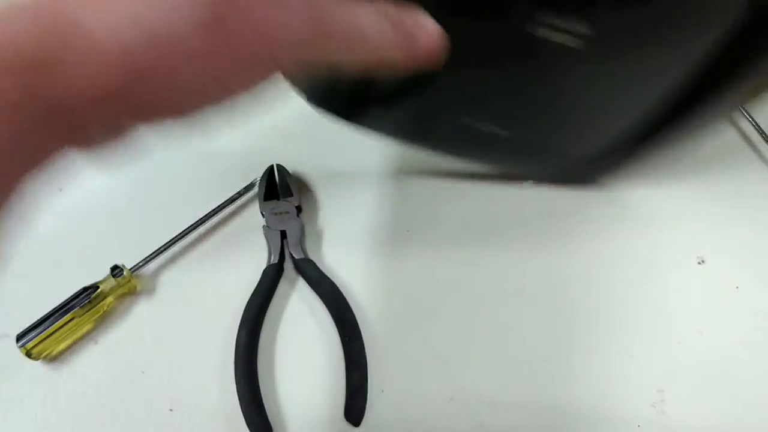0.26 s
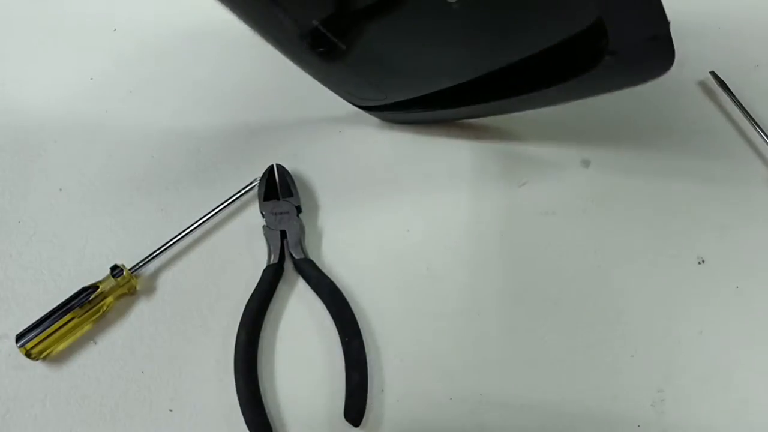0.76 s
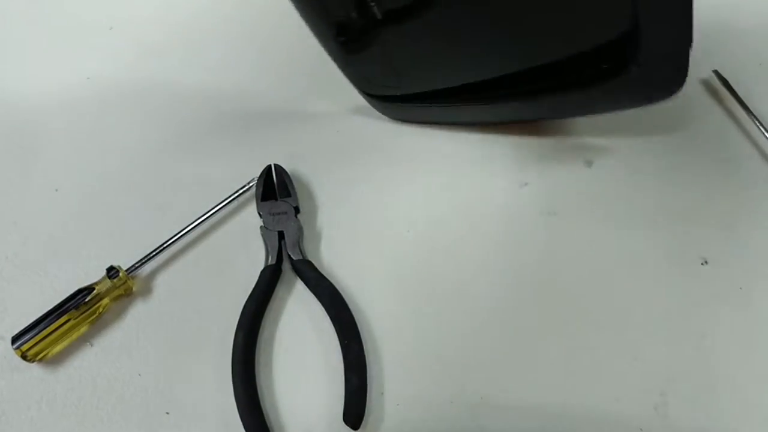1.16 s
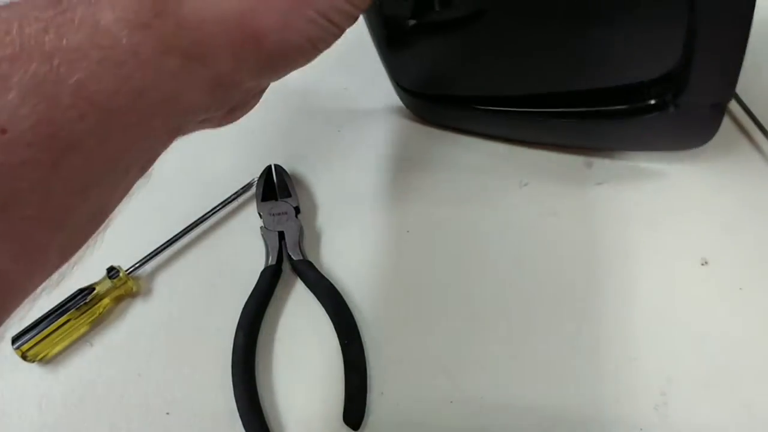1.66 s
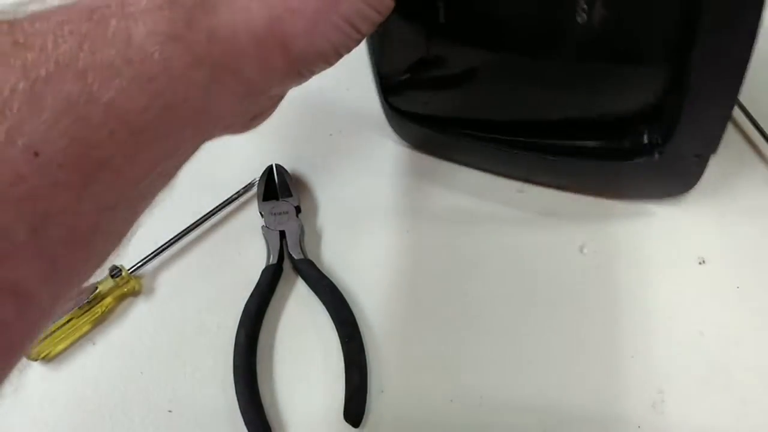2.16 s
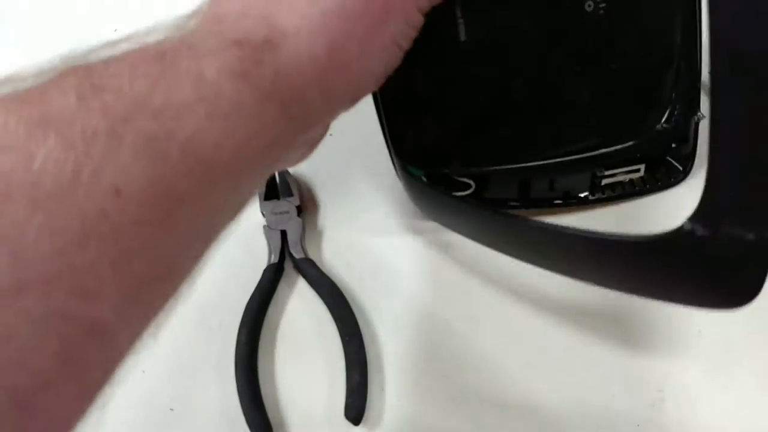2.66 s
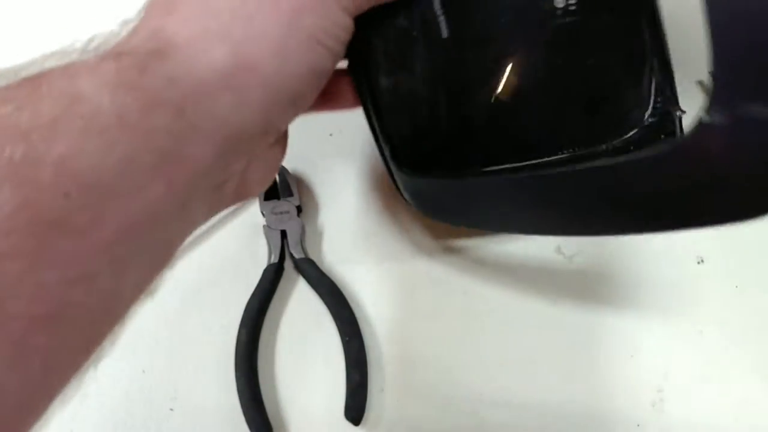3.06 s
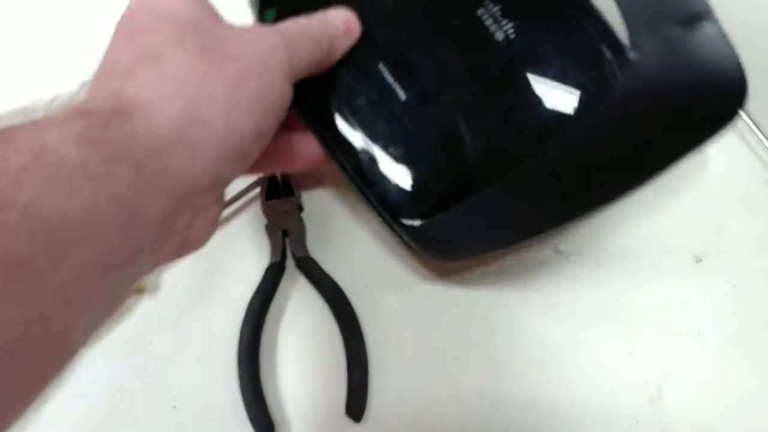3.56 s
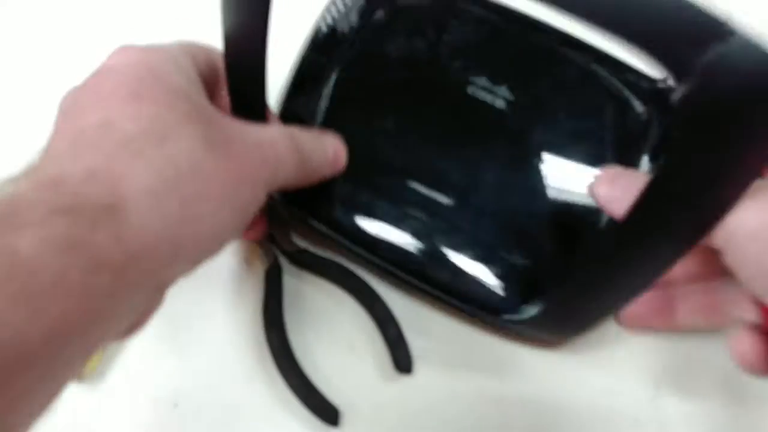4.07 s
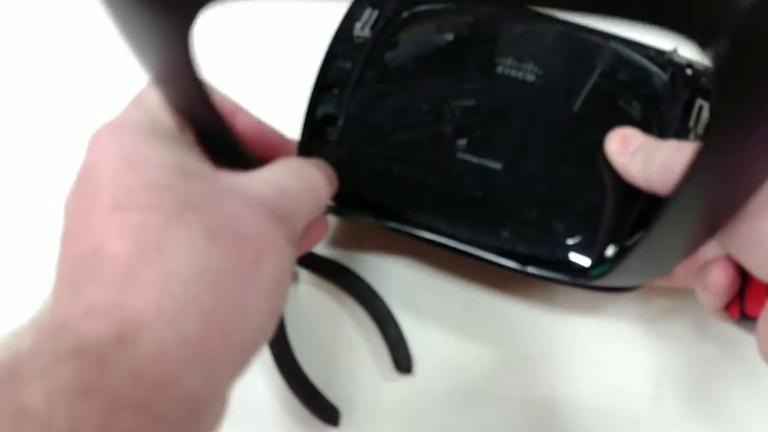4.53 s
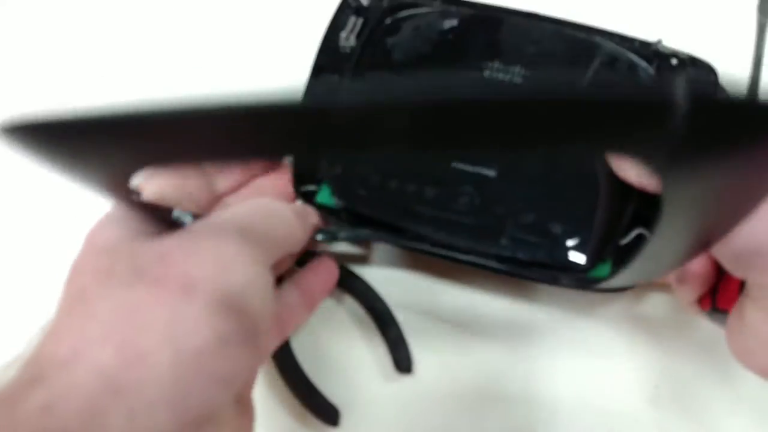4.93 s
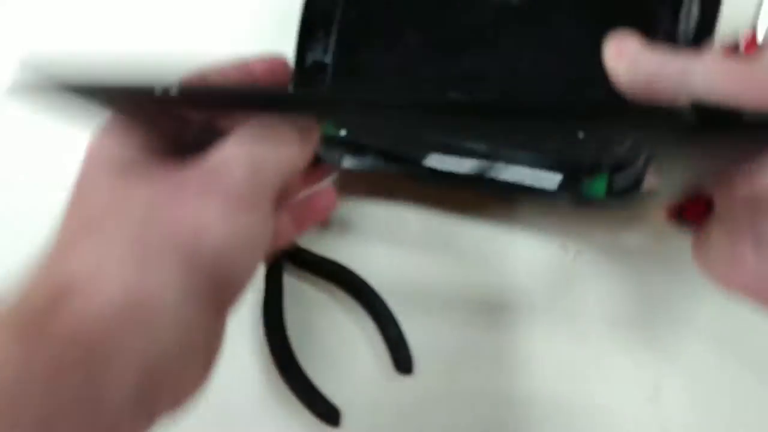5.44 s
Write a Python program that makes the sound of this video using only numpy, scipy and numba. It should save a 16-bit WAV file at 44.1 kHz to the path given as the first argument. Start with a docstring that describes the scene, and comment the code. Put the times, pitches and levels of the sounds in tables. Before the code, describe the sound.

Hands force a hard plastic case apart on a workbench, heard close in stereo in a bare, quiet room. It opens with a very brief, soft scrape and small clicks. The case knocks dully on the bench at 0.6 seconds, and a loud, bright snap follows at 1.1, with smaller clicks after it. Around 1.8 seconds comes a quick cluster of very loud cracks with a thump and a short rumble. Lighter snaps lead to another hard crack and knock at about 2.5 seconds. From 3 to 4 seconds there are only soft, scattered clicks and faint finger rubbing. A knock at 4.1 precedes one more loud snap at 4.4. Faint creaking ticks run from 4.7 to 5.2 seconds, with a moderate click and bump at 4.9, and two smaller snaps come near 5.5 and 5.7. The hardest snaps leave a short echo.

```python
"""Sharp plastic snaps, knocks and creaks in a bare room: hands force a hard case apart over a workbench.
Each snap of a clip is a burst of tiny fractures that makes the shell ring. The case knocks and drags
on the bench top, while the fingers rub and creak. A stereo recorder stands close by; its limiter
turns the sound down on the hardest snaps, then lets the echo of the room swell back."""
import sys
import numpy as np
from scipy import signal
from scipy.fft import rfft, irfft
from scipy.io import wavfile
from scipy.ndimage import uniform_filter1d
from numba import njit

SR = 44100
rng = np.random.default_rng(int(sys.argv[2]) if len(sys.argv) > 2 else 0)


def transcribe(signal):
    """Save signal, clipped to [-1, 1], as a 16-bit WAV file at the path in sys.argv[1]."""
    frames = np.atleast_2d(signal).T
    limited = np.clip(frames, -1, 1)
    pcm = np.round(limited * 32767).astype(np.int16)
    wavfile.write(sys.argv[1], SR, pcm)


N = 251370

# The bench top's natural tones. Each row: pitch in Hz, level in dB, undamped seconds to fade by 60 dB.
BENCH_MODES = [(104, -5, 0.13), (177.3, -24, 0.089), (198.6, 3, 0.15), (264, -7, 0.12), (294, -5, 0.099),
               (289, 3.5, 0.1), (345, -10.5, 0.056), (393.5, 1.5, 0.072), (494, -17.5, 0.15),
               (576, -16, 0.091)]
# A pan is left minus right level. The case's panel is a little louder on the right but sooner on the left.
PANEL_PAN_DB, PANEL_LEAD_SAMPLES = -1.2, 3.4


def undb(db):
    return 10 ** (np.asarray(db) / 20)


def level(x, db):
    """Scale a sound to an average (RMS) level."""
    return x * undb(db) / np.sqrt(np.mean(x ** 2))


def band(x, lo_hz, hi_hz):
    """Keep what lies between two frequencies."""
    edges = [lo_hz, min(hi_hz, .45 * SR)]
    return signal.sosfilt(signal.butter(2, edges, "band", fs=SR, output="sos"), x)


def ring(x, hz, width_hz):
    """One resonance: the narrower it is, the longer it rings."""
    return signal.lfilter(*signal.iirpeak(hz, hz / width_hz, SR), x)


def stereo_noise(samples, alike):
    """Noise for two microphones; alike (0 to 1) is the share they have in common."""
    common, left, right = rng.standard_normal((3, samples))
    return np.sqrt(alike) * common + np.sqrt(1 - alike) * np.array([left, right])


def place(out, start, sound, peak_db, pan_db=0., lead=None):
    """Mix a sound in. The left hears it lead samples sooner; by default the louder side is first."""
    sound = sound * undb(peak_db + np.array([[pan_db], [-pan_db]]) / 2) / np.abs(sound).max()
    if lead is None:
        lead = 1.75 * pan_db
    lag = int(round(np.clip(lead, -6, 6)))
    for side, delay in enumerate((max(-lag, 0), max(lag, 0))):
        i = int(start * SR) + delay
        out[side, i:i + sound.shape[1]] += sound[side, :N - i]


def air():
    """Steady room tone and microphone hiss."""
    # The tone of the noise. Each row: frequency in Hz, relative level in dB.
    spectrum = [(15, -36), (25, -6), (175, 0), (416, -5.5), (659, -7), (1160, -8), (1740, -16.5),
                (2690, -13), (3430, -43.5), (7110, -20.5), (9570, -12.5), (14800, -16.5), (16000, -22.5)]
    row_hz, row_db = np.transpose(spectrum)
    hz = np.maximum(np.arange(N // 2 + 1) * SR / N, 1)
    gain = undb(np.interp(np.log(hz), np.log(row_hz), row_db))
    return level(irfft(rfft(stereo_noise(N, alike=0.18)) * gain, N), db=-65)


def room_echo(sound):
    """The walls return a smooth wash of echo; its bass arrives alike at both microphones."""
    # Octave-wide bands of echo. Each row: centre in Hz, seconds to fade by 60 dB, level in dB.
    echo_bands = [(109, 0.23, -23), (252, 0.29, -24.5), (463, 0.22, -21), (1080, 0.46, -27.5),
                  (2140, 0.41, -22.5), (4536, 0.49, -21.5), (7960, 0.34, -16), (13100, 0.23, -30.5),
                  (15400, 0.22, -19)]
    peak_width_hz, rise_s = 150, 0.017
    t = np.arange(SR) / SR
    peaks = uniform_filter1d(rng.standard_normal(SR // 2 + 1), peak_width_hz) * np.sqrt(peak_width_hz)
    colour = undb(2.5 * np.clip(peaks, -2, 2))  # some pitches echo more than others
    rise = np.minimum(t / rise_s, 1) ** 2
    echo = 0
    for hz, fade_s, db in echo_bands:
        noise = irfft(rfft(stereo_noise(SR, alike=min(200 / hz, 0.85))) * colour, SR)
        tail = band(noise, hz / np.sqrt(2), hz * np.sqrt(2)) * undb(-60 * t / fade_s)
        echo = echo + undb(db) * tail * rise / np.sqrt(min(hz, 12000) / 100)
    return signal.fftconvolve(sound.mean(axis=0)[None], echo)[:, :N]


def random_grains(per_second, samples_each):
    """Short pulses of uneven strength that make a noise sound rough."""
    starts = rng.random(N) < per_second / SR
    return uniform_filter1d(starts * undb(2.5 * rng.exponential(size=N)), samples_each)


def handling_noise():
    """Low rumble, creak and rustle: quiet handling noise whose levels rise and fall over time."""
    # Each row: time in seconds, then the levels in dB of the rumble, the creak and the rustle.
    noise_levels = [(0.0, -48.5, -51.5, -62.5), (0.07, -65, -55, -62), (0.38, -111, -91, -72),
                    (0.63, -54, -60.5, -94), (0.761, -55, -60.5, -59), (0.97, -65, -70, -61.5),
                    (1.19, -46.5, -71, -59), (1.41, -62.5, -64.5, -67), (1.67, -62.5, -70, -58),
                    (1.86, -27, -36.5, -48), (1.94, -43, -42, -58), (2.131, -53.5, -62.5, -100),
                    (2.361, -76, -79.5, -68), (2.478, -58, -71, -56), (2.636, -35, -49.5, -58.5),
                    (2.72, -46, -56, -57), (2.82, -58, -64.5, -77.5), (3.14, -76, -87.5, -80),
                    (3.259, -83.5, -89.5, -75.5), (3.501, -87.5, -76, -81.5), (3.671, -77, -69, -75.5),
                    (3.859, -71.5, -74, -61), (3.979, -65, -74.5, -64.5), (4.19, -64, -64.5, -61.5),
                    (4.48, -63.5, -68, -72), (4.642, -60, -63, -69), (5.001, -61.5, -64, -69),
                    (5.52, -71, -74.5, -72.5), (5.7, -58, -52.5, -62)]
    times, *columns = np.transpose(noise_levels)
    rumble_db, creak_db, rustle_db = (np.interp(np.arange(N) / SR, times, db) for db in columns)
    grains = random_grains(per_second=250, samples_each=200) + 0.00095
    shake = stereo_noise(N, alike=0.8) * grains
    rumble = sum(undb(db) * ring(shake, hz, 4 / fade_s) for hz, db, fade_s in BENCH_MODES)
    jerks = random_grains(per_second=340, samples_each=90) + 0.004
    rasp = stereo_noise(N, alike=0.13) * jerks
    creak = ring(rasp, 1400, 250) + .5 * ring(rasp, 760, 360) + 0.3 * ring(rasp, 2000, 200)
    creak = ring(creak, 980, 820)
    rustle = band(stereo_noise(N, alike=0.45) * (grains + 0.026), 2100, 27000)
    return level(rumble, rumble_db) + level(creak, creak_db) + level(rustle, rustle_db)


def rim_groan():
    """The rim drags over the bench in quick, regular slips that make a short, rough tone."""
    # Each row: time in seconds, slips per second (the pitch in Hz), level in dB.
    drag = [(0.004, 436, -44), (0.013, 440.5, -46.5), (0.026, 438, -35.5), (0.045, 462, -47),
            (0.053, 350, -44), (0.061, 306, -47.5), (0.069, 300, -66)]
    # The relative level in dB of each harmonic, lowest first.
    harmonics_db = [0.5, -9, -7.5, -17]
    times, hz, db = np.transpose(drag)
    t = np.arange(N) / SR
    wobble = uniform_filter1d(rng.standard_normal(N), 200) * np.sqrt(200)
    phase = 2 * np.pi * np.cumsum(np.interp(t, times, hz) * (1 + 0.026 * wobble)) / SR
    tone = sum(undb(gain_db) * np.sin(k * phase) for k, gain_db in enumerate(harmonics_db, 1))
    return level(tone, np.interp(t, times, db, left=-200, right=-200) + 0.61 * wobble)


def joint_ticks():
    """A joint creaks under the grip in single ticks: a ring of the panel plus a wisp of hiss."""
    # Each row: start in seconds, peak level in dB, panel pitch in Hz.
    ticks = [(4.678, -45, 1170), (4.712, -54, 1090), (4.745, -46, 1160), (4.757, -50, 1200),
             (4.769, -53, 1080), (4.784, -48.5, 1200), (4.797, -54, 1166), (4.862, -46, 980),
             (4.982, -56, 1440), (5.015, -52, 1200), (5.079, -57, 1170), (5.095, -49, 1230),
             (5.103, -50, 1124), (5.116, -49, 1150), (5.121, -56, 1200), (5.133, -55, 1210),
             (5.152, -52, 1370), (5.17, -50.5, 1220), (5.198, -53, 1100)]
    out, t = np.zeros((2, N)), np.arange(SR // 10) / SR
    click = np.ones((2, 1)) * (t == 0)
    for start, db, hz in ticks:
        panel = ring(ring(click, hz, width_hz=98), hz, width_hz=450)
        place(out, start, panel, db, PANEL_PAN_DB, PANEL_LEAD_SAMPLES)
        hiss = stereo_noise(len(t), alike=0.53) * undb(-60 * t / 0.015)
        place(out, start, band(hiss, 5100, 14600), db + 1.5, pan_db=6.)
    return out


def bench_knocks():
    """The case rings the bench's low tones, in a new mix at each spot; longer contact sounds duller."""
    # Each row: start in seconds, peak level in dB, contact time in seconds (capped below).
    hits = [(0.024, -65, 0.00075), (0.261, -47, 0.0017), (0.614, -15.5, 0.0025), (0.989, -41, 0.003),
            (1.094, -15.5, 0.00033), (1.279, -46, 0.0092), (1.464, -44, 0.0017), (1.656, -36.5, 0.0011),
            (1.741, -40, 0.0018), (1.781, -5, 0.00073), (1.816, -14.5, 0.0026), (2.052, -38.5, 0.001),
            (2.31, -28, 0.0046), (2.51, -64, 0.001), (2.555, -6.5, 0.0014), (2.829, -39.5, 0.00048),
            (3.053, -37, 0.00079), (3.348, -45, 0.0019), (3.416, -64.5, 0.0018), (3.745, -59, 0.0047),
            (4.047, -40.5, 0.00094), (4.129, -15.5, 0.0018), (4.447, -25, 0.0031), (4.882, -28.5, 0.003),
            (5.058, -38, 0.0033), (5.207, -37, 0.00075), (5.536, -52.5, 0.00084), (5.643, -43.5, 0.0042)]
    hand_damping = 1.7  # the bench dies away this many times faster under the hands
    out, t = np.zeros((2, N)), np.arange(SR // 4) / SR
    sides = np.array([[1], [-1]])
    for start, peak_db, contact_s in hits:
        spot = rng.standard_normal((len(BENCH_MODES), 3))
        ringing = 0
        for (hz, db, fade_s), (louder, detune, spread) in zip(BENCH_MODES, spot):
            envelope = undb(db + 1.5 * louder - 60 * hand_damping * t / fade_s)
            phase = 2 * np.pi * hz * (1 + 0.024 * detune) * t + 0.5 * spread * sides
            ringing = ringing + envelope * np.sin(phase)
        push = np.hanning(int(np.clip(contact_s, .0003, .008) * SR))
        place(out, start, signal.fftconvolve(ringing, push[None]), peak_db, pan_db=1.7, lead=0)
    return out


def plastic_case(force, panel_hz, kick=0.):
    """A force rings the case three ways: a middle crack, a high sizzle and the bent panel's note."""
    # The shell's broad resonances. Each row: centre in Hz, width in Hz, relative level in dB.
    shell_modes = [(2500, 1400, 4), (3120, 1100, -1), (5070, 1500, -6), (6600, 1500, 3), (9000, 5700, 16),
                   (10200, 1800, -8.5), (15060, 1200, 7)]
    # The hollow case's resonances. Each row: centre in Hz, width in Hz, relative level in dB.
    hollow_modes = [(350, 160, -3), (907, 150, -1), (1250, 250, 4.5), (1569, 100, 6.5), (2064, 140, 1.5),
                    (2514, 450, -2.5), (3124, 180, -4.5), (5326, 170, -14), (6210, 740, -13)]
    shell = sum(undb(db) * ring(force, hz, width) for hz, width, db in shell_modes)
    hollow = sum(undb(db + 8.5) * ring(force, hz, width) for hz, width, db in hollow_modes)
    push, lower_hz = force + kick, 0.751 * panel_hz
    main_note = ring(ring(push, panel_hz, 370), panel_hz, 0.14 * panel_hz)
    lower_note = ring(ring(push, lower_hz, 300), lower_hz, 150)
    return band(shell, 1300, 4380) + hollow, band(shell, 7600, 17000), main_note + undb(-9) * lower_note


def fractures(t, decay_s):
    """Plastic gives way in a run of uneven breaks that holds for a moment, then dies fast."""
    spikes = undb(1.47 * rng.exponential(size=len(t)))
    attack = np.minimum(t / (0.04 * decay_s), 1)
    collapse = undb(-60 * (t / decay_s) ** 1.173)
    return stereo_noise(len(t), alike=0.7) * spikes * attack * collapse


def fullness_db(x):
    """A sound's average level compared with its peak."""
    return 10 * np.log10(np.mean(x ** 2) / np.max(x ** 2))


def clip_snaps():
    """Fractures ring the case. Returns the direct sound and a smoother one that goes to the walls."""
    # Each row: start in seconds, crack peak in dB, panel pitch in Hz, panel and sizzle levels in dB
    # above the crack, sizzle pan in dB, seconds for the fractures to fade by 60 dB.
    snaps = [(0.0074, -29.5, 1590, -12, -8, 5, 0.13), (0.024, -30, 970, -8, -2.5, 21, 0.021),
             (0.0513, -30.5, 980, -7, -7, -1, 0.028), (0.189, -48, 837, -10, -2, 20, 0.1),
             (0.2952, -37.5, 1330, -10.5, -3.5, 13.5, 0.083), (0.4079, -49.5, 1240, -1, -9, 11, 0.09),
             (0.557, -59.5, 1330, 2, -8, 13, 0.31), (0.6117, -40, 727, -1, 0.5, 2, 0.082),
             (0.737, -44, 1350, -6, -11, 13, 0.063), (0.8051, -23.5, 1470, -13.5, -5.5, 10.5, 0.026),
             (0.8994, -33, 1140, -40, -38, 17.5, 0.032), (0.9268, -44, 1517, -13, -29, 3.5, 0.084),
             (0.9913, -21.5, 1360, -15.5, 5, 11.5, 0.024), (1.096, 5, 1190, -11, 3, 14, 0.024),
             (1.213, -27, 1460, -4.5, -2, -0.5, 0.03), (1.2406, -27.5, 705, -7, -8, 13.5, 0.041),
             (1.278, -20.5, 1320, -7.5, -5.5, 8, 0.053), (1.288, -22, 1310, -16, -20, -0.5, 0.021),
             (1.422, -43, 1430, -10, -5, 13, 0.041), (1.5944, -38.5, 1330, -19, 12, 14.5, 0.015),
             (1.63, -45.5, 1360, 4.5, -3, 6, 0.034), (1.6528, -35.5, 890, -7, -12, -1, 0.021),
             (1.67, -38, 870, -7, -2.5, 15, 0.036), (1.683, -44.5, 1220, -1, -1, 10, 0.022),
             (1.697, -46, 1220, -2, -0.5, 11, 0.023), (1.722, -36.5, 1540, -9, 13.5, 6.5, 0.036),
             (1.7394, -31.5, 1180, -10.5, -7.5, 7.5, 0.062), (1.749, -26.5, 1250, -9, -10, -5, 0.033),
             (1.758, -28.5, 1310, -5.5, -16, -2, 0.041), (1.7809, 6.5, 1220, -13, 3.5, 10.5, 0.03),
             (1.791, -7.5, 1367, -4.5, -7, 4.5, 0.047), (1.804, -18, 1680, 1, 5, 14, 0.02),
             (1.817, 4, 1187, -10, 6, 1, 0.025), (1.8199, 5, 1180, -6.5, 6, 12.5, 0.022),
             (1.962, -39, 1200, -5, -24, -14, 0.065), (1.9728, -18.5, 1273, 0, -3, 4, 0.026),
             (2.093, -23.5, 1280, -25, 3.5, 9.5, 0.038), (2.311, -16, 1080, -5.5, -1, 3, 0.029),
             (2.518, -6.5, 1297, -3.5, 3.5, 12, 0.034), (2.552, 8.5, 1146, -10.5, 8, 9, 0.024),
             (2.5641, -1, 1200, -7, 5.5, 15.5, 0.02), (2.798, -39, 1220, 0, -10, 3, 0.075),
             (2.82, -29.5, 1350, -3, -11, 11.5, 0.049), (2.84, -40.5, 1060, 2.5, -3.5, 13, 0.052),
             (3.052, -29, 1364, 0.5, -30, 1.5, 0.033), (3.076, -38, 1277, -4, 0, 14, 0.036),
             (3.325, -46, 1235, -8, -3, 5, 0.26), (3.347, -33, 1450, -2, -5.5, 9, 0.031),
             (3.416, -24, 1392, -1, -20, 15, 0.051), (3.7355, -46, 1160, -3, -0.5, 3, 0.14),
             (3.7501, -45, 996, 2.5, 6, 9, 0.1), (3.877, -52.5, 1070, -2.5, 16, 12, 0.11),
             (4.047, -43, 1000, -15, -30, 17, 0.0097), (4.128, -26, 1135, -5.5, 0, 12.5, 0.051),
             (4.158, -42, 1130, 5, 3.5, 10, 0.12), (4.292, -53.5, 1133, -23, 8, 7, 0.032),
             (4.4463, -19, 1100, -22, 6, -3, 0.02), (4.4485, 1.5, 1114, -12, 10.5, 6.5, 0.03),
             (4.462, -31.5, 1128, 6, -14, 3, 0.012), (4.6722, -49, 1200, -2, 2.5, 11, 0.11),
             (4.8219, -49, 325, 13, -3, 14, 0.017), (4.879, -21, 1080, -7.5, 2.5, 10, 0.034),
             (4.905, -36.5, 1062, -14, 3, 9.5, 0.021), (5.0463, -61, 1157, 17, 20, 2.5, 0.021),
             (5.0606, -35, 1117, 0.5, -8, 9, 0.05), (5.1862, -44.5, 1170, -13, -9, 25, 0.033),
             (5.206, -37, 1014, 11.5, 1.5, 12, 0.06), (5.218, -55.5, 526, 17, -3, 3, 0.053),
             (5.261, -52, 1150, 9.5, 7, 15, 0.036), (5.296, -32, 1143, -5.5, 3, 14, 0.039),
             (5.33, -59.5, 1040, 11, 12, 5, 0.045), (5.42, -46.5, 1000, -2, -3.5, 20, 0.15),
             (5.451, -52.5, 846, -1, 11.5, 7, 0.072), (5.537, -21.5, 943, 2, -8.5, 12.5, 0.057),
             (5.556, -50, 960, 7, -6, 2, 0.095), (5.54, -39, 568, 16, 18.5, 2.5, 0.029),
             (5.651, -38.5, 970, -21, 4, 9.5, 0.026), (5.685, -18, 1002, 2, 3.5, 8, 0.031)]
    # The sizzle's brightest pitch at the main snaps; the others take values in between.
    # Each row: time in seconds, pitch in Hz.
    sizzle_brightness = [(0.8, 8000), (0.99, 9400), (1.096, 11200), (1.6, 8850), (1.78, 10200),
                         (1.82, 8200), (2.09, 7490), (2.52, 9760), (2.555, 9000), (4.13, 9800),
                         (4.448, 8900), (4.88, 10700), (5.3, 10000), (5.54, 10240), (5.685, 9000)]
    wall_db, sizzle_fade_s = -5, 0.064
    direct, to_walls = np.zeros((2, N)), np.zeros((2, N))
    t = np.arange(SR // 10) / SR
    click = np.ones((2, 1)) * (t == 0)
    for start, db, panel_hz, panel_db, sizzle_db, sizzle_pan_db, decay_s in snaps:
        force = fractures(t, decay_s)
        kick = 1.2 * np.sqrt(np.sum(force ** 2) / 2) * click  # the bent panel first lets go
        crack, sizzle, panel = plastic_case(force, panel_hz, kick)
        bright_hz = np.interp(start, *np.transpose(sizzle_brightness))
        sizzle = sizzle + undb(6) * ring(sizzle, bright_hz, width_hz=5000)
        sizzle = sizzle * undb(-60 * t / sizzle_fade_s)  # the treble is spent in the first fractures
        place(direct, start, crack, db, PANEL_PAN_DB + 0.23 * sizzle_pan_db)
        place(direct, start, sizzle, db + sizzle_db, sizzle_pan_db)
        place(direct, start, panel, db + panel_db, PANEL_PAN_DB, PANEL_LEAD_SAMPLES)
        # The walls get the snap blended from all sides, nearly as one smooth click.
        far_crack, far_sizzle, far_panel = plastic_case(click, panel_hz)
        far_panel = 2.2 * band(click, 230, 1200) + 2.0 * far_panel
        parts = (crack, far_crack, 0), (sizzle, far_sizzle, sizzle_db), (panel, far_panel, panel_db - 1.5)
        for rough, smooth, part_db in parts:
            blend = smooth + 0.34 * level(rough, 0) * np.std(smooth)
            same_energy_db = fullness_db(rough) - fullness_db(blend)
            place(to_walls, start, blend, db + part_db + same_energy_db + wall_db)
    return direct, to_walls


def scene():
    """All the sources together; only the snaps and the bench's knocks and groan echo."""
    snaps, to_walls = clip_snaps()
    ticks = joint_ticks()
    bench = bench_knocks() + rim_groan()
    echo = room_echo(to_walls + undb(-2) * bench)
    return snaps + ticks + bench + echo + handling_noise() + air()


@njit
def limiter_gain(allowed_db, recovery):
    """The gain drops at once on a loud peak, then creeps back towards 0 dB."""
    out, gain_db = np.empty(len(allowed_db)), 0.
    for i in range(len(allowed_db)):
        gain_db = min(allowed_db[i], gain_db * (1 - recovery))
        out[i] = gain_db
    return out


def record(dry):
    """Small microphones lose the deep bass; a limiter grabs too late for the first peaks, which clip."""
    bass_cut_hz, treble_cut_hz = 82, 16100
    release_s, grab_samples = 0.056, 7
    sound = signal.sosfilt(signal.butter(2, bass_cut_hz, "high", fs=SR, output="sos"), dry)
    allowed_db = np.minimum(-20 * np.log10(np.abs(sound).max(axis=0) + 1e-9), 0)
    gain_db = limiter_gain(allowed_db, 1 / (release_s * SR))
    gain_db = signal.lfilter(np.ones(grab_samples) / grab_samples, 1, gain_db)
    clipped = np.clip(sound * undb(gain_db), -.93, .93)
    treble_cut = signal.ellip(8, .2, 70, treble_cut_hz, fs=SR, output="sos")
    return np.clip(signal.sosfilt(treble_cut, clipped), -1, 1)


dry = scene()
out = record(dry)
transcribe(out)
```